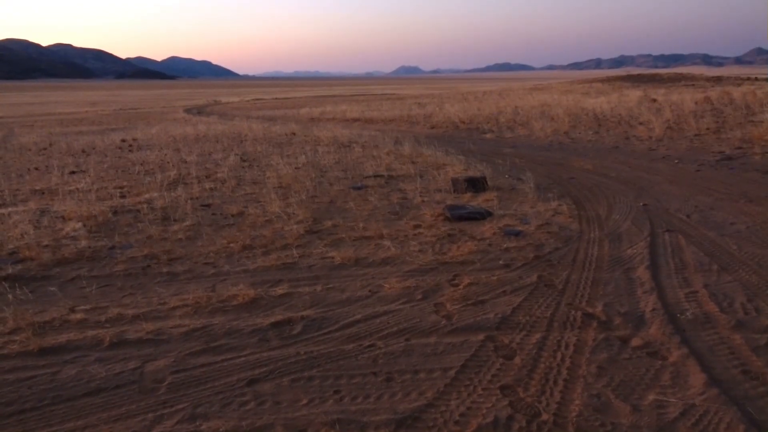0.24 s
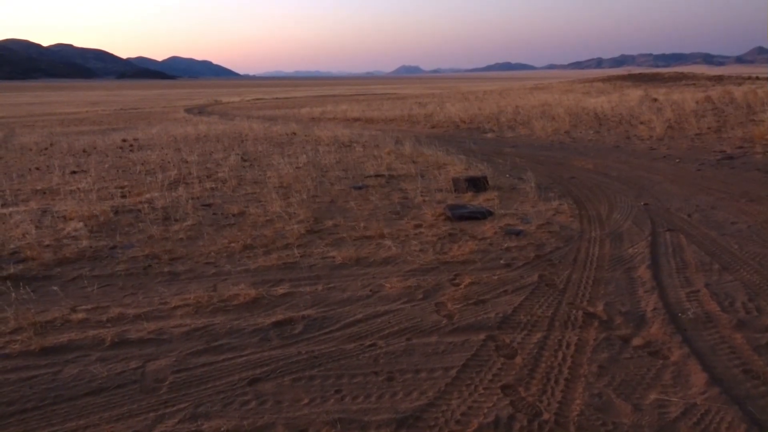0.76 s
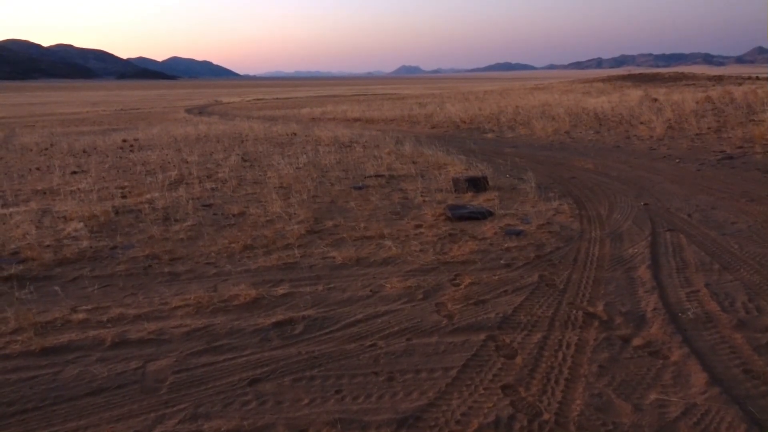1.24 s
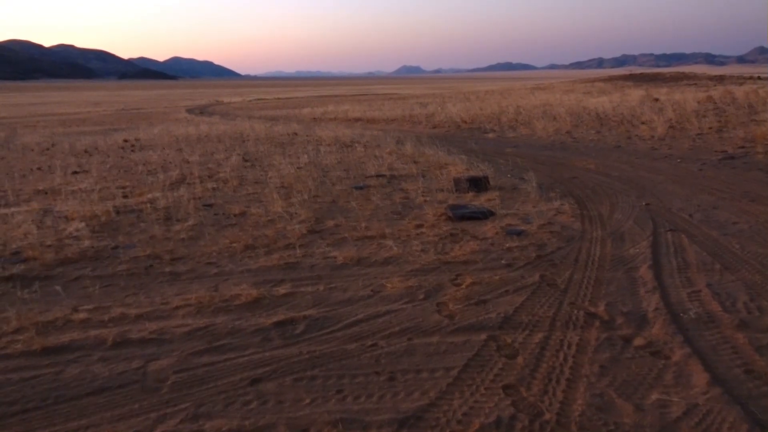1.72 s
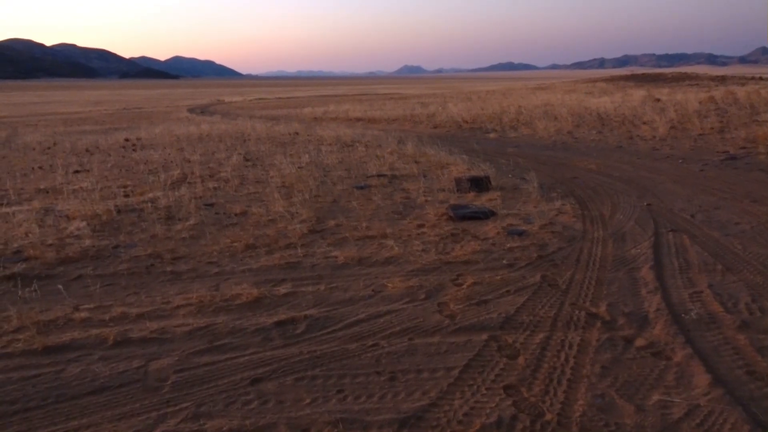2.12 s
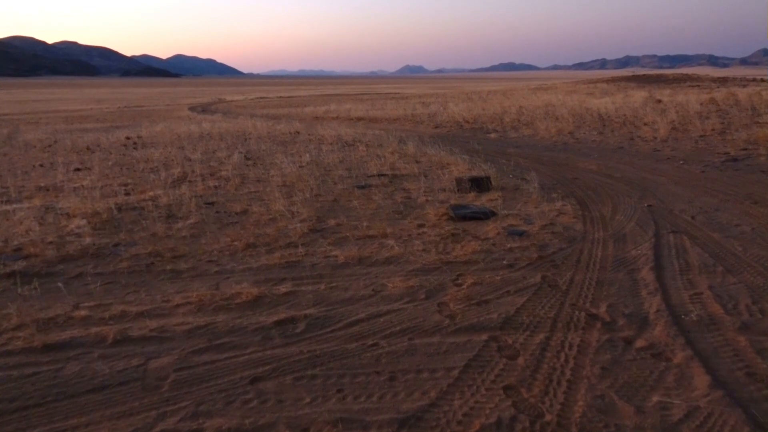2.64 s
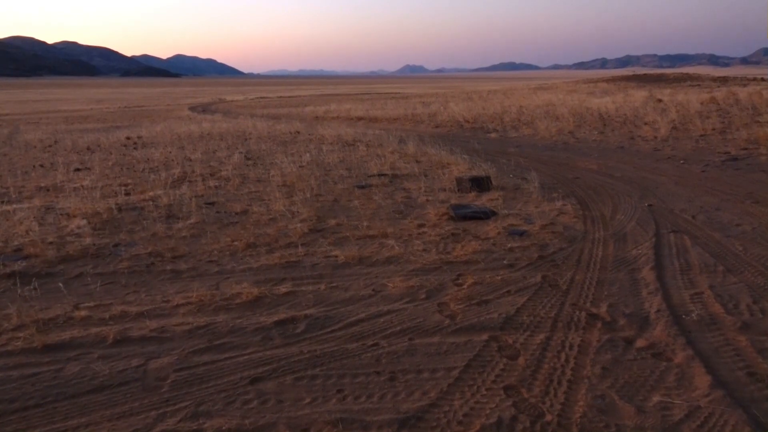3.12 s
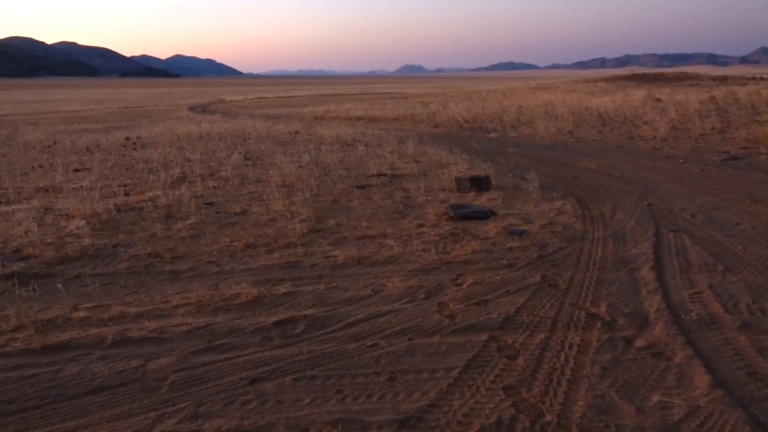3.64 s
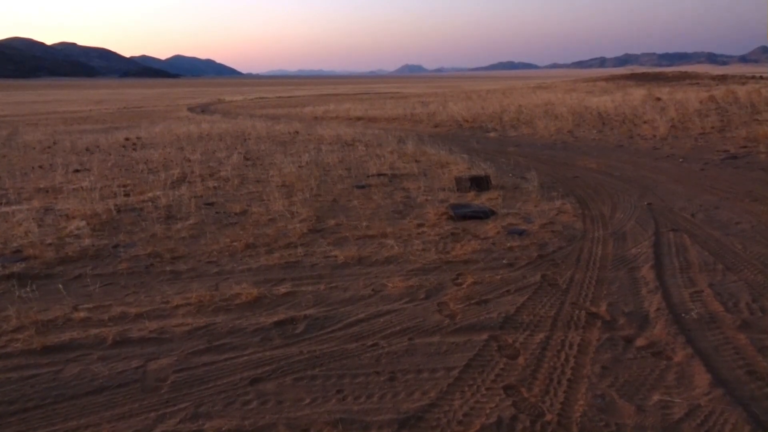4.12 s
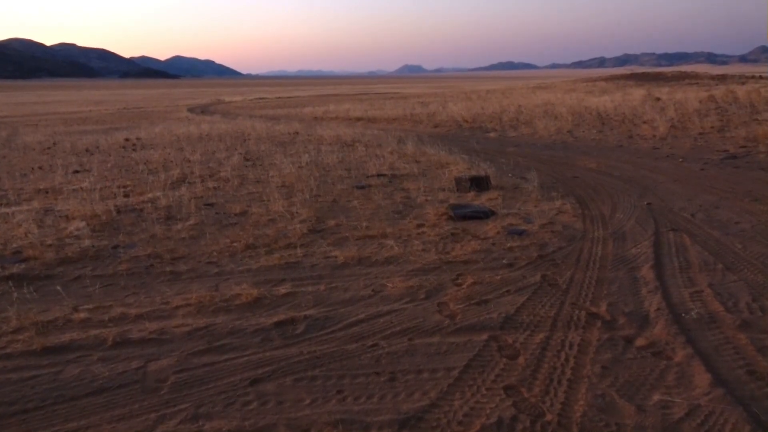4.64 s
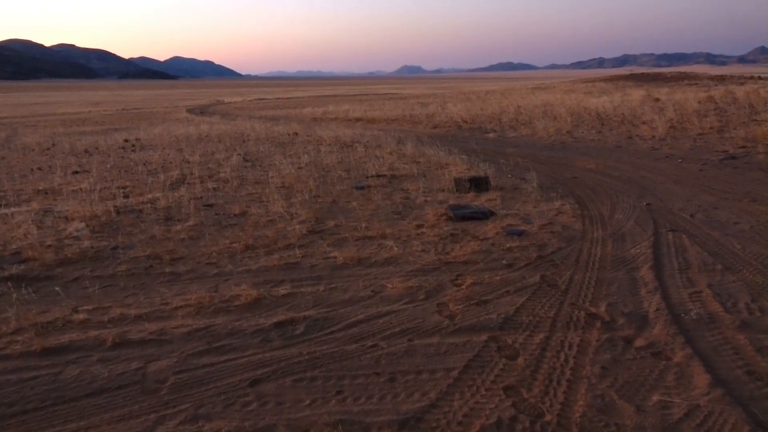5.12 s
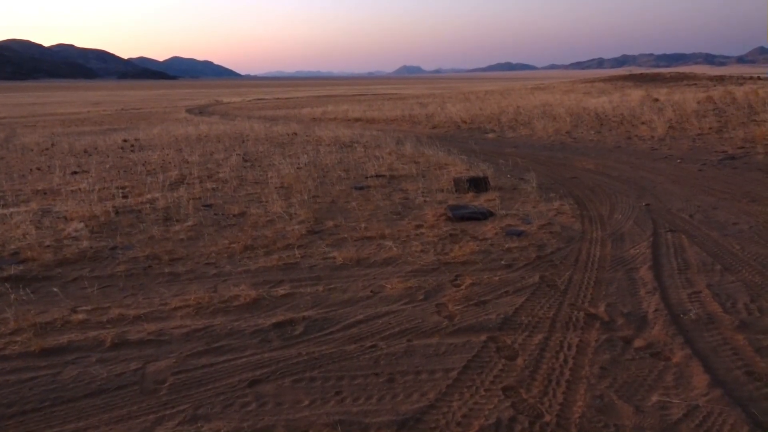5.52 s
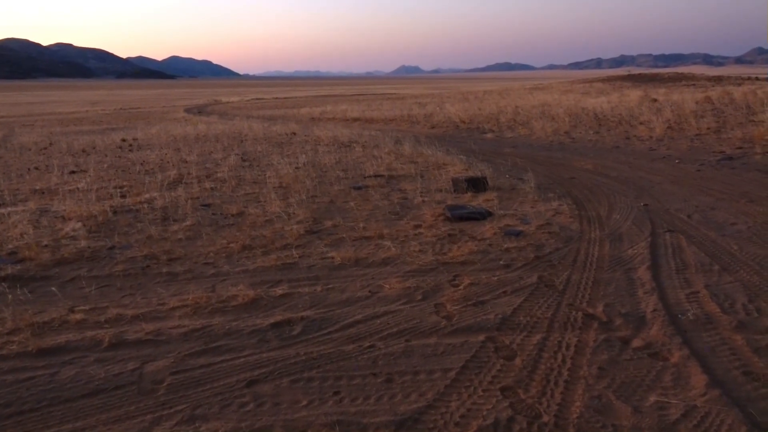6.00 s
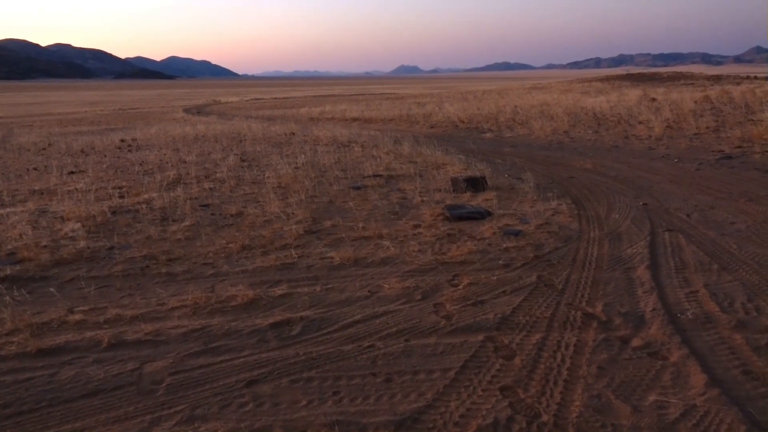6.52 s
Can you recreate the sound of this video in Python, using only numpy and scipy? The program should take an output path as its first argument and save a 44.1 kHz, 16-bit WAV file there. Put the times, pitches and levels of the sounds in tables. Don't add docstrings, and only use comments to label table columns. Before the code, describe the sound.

Stereo field sound of barking geckos in open desert grassland. Distant dry clicking runs come first, mostly left; a near caller follows with six sharp, evenly spaced rattling barks, very loud and bright. Left-side callers then overlap in medium-loud series before leaving only a blurred far chorus, steady microphone hiss and dull, irregular wind bumps, strongest in the middle.

```python
import sys
import numpy as np
from scipy import signal
from scipy.fft import rfft, irfft
from scipy.io import wavfile
from scipy.ndimage import uniform_filter1d, minimum_filter1d

SR = 44100
rng = np.random.default_rng(int(sys.argv[2]) if len(sys.argv) > 2 else 0)


def transcribe(u):
    v = np.clip(np.atleast_2d(u).T, -1, 1)
    q = np.round(v * 32767).astype(np.int16)
    wavfile.write(sys.argv[1], SR, q)


def elevation(decibels):
    levels = np.asarray(decibels, float)
    return 10 ** (levels / 20)


N = 298557


def shaped(x, points):
    hz, db = np.transpose(points)
    f = np.maximum(np.fft.rfftfreq(x.shape[-1], 1 / SR), 1)
    gain = elevation(np.interp(np.log(f), np.log(hz), db))
    return irfft(rfft(x) * gain, x.shape[-1])


def level(x, db):
    return x * elevation(db) / np.sqrt(np.mean(x ** 2))


def walk(rate):
    hold = int(SR / rate)
    steps = np.repeat(rng.standard_normal(N // hold + 1), hold)
    return 1.5 * uniform_filter1d(uniform_filter1d(steps, hold), hold)[:N]


def add(out, start, x):
    stop = min(start + x.shape[-1], N)
    out[..., start:stop] += x[..., :stop - start]


# f/Hz, level/dB [per Hz]
PLAIN_COLOUR = [(88, -15.5), (150, -33), (264, -13.5), (555, -5.5), (730, -7), (871, -2.5), (1040, -3),
                (1390, -5.5), (1530, -5), (2600, -7.5), (3100, -10), (3620, -6.5), (4240, -12),
                (13200, -17), (16000, -19)]
# f/Hz, likeness [-1 to 1]
LIKENESS = [(200, 0.86), (400, 0.38), (700, -0.046), (1300, 0.063), (3000, 0.34), (7000, 0.44),
            (15000, 0.53)]
# t/s, level/dB
CHORUS_SWELL = [(0, 1), (1, 1), (2, 0.5), (2.6, 3), (3.5, 2), (4.2, 1), (5, 3), (5.8, 1.5), (6.3, 1),
                (6.77, 0.5)]


def plain():
    mid, side = rng.standard_normal((2, N))
    like = [(hz, np.clip(c, -.95, .95)) for hz, c in LIKENESS]
    mid = shaped(mid, [(hz, 10 * np.log10(1 + c)) for hz, c in like])
    side = shaped(side, [(hz, 10 * np.log10(1 - c)) for hz, c in like])
    both = level(shaped(np.array([mid + side, mid - side]), PLAIN_COLOUR), -49)
    chorus = shaped(both, [(500, -56), (800, -5.0), (4500, 3.0), (5500, -50)])
    swell_db = np.interp(np.arange(N) / SR, *np.transpose(CHORUS_SWELL))
    flicker = elevation(1.4 * np.array([walk(22), walk(16)]) + swell_db)
    hiss = both - chorus
    return (hiss + flicker * chorus) * elevation(np.array([[0.1], [.4]]))


# centre t/s, peak level/dB, pitch f/Hz, length [cycles]
THUMPS = [(0.049, -31.5, 124, 1.2), (1.433, -34, 142, 1.4), (2.449, -13, 191, 0.76), (2.532, -29.5, 136, 1),
          (2.86, -31, 149, 2.1), (3.29, -28.5, 145, 1.4), (3.316, -29.5, 127, 2.1), (3.364, -23, 153, 0.61),
          (3.374, -25.5, 160, 0.98), (3.447, -12.5, 158, 0.35), (3.456, -25, 140, 3.6),
          (3.49, -21.5, 144, 0.55), (3.731, -21.5, 124, 0.48), (3.746, -18.5, 172, 0.94),
          (4.204, -32, 143, 0.77), (4.305, -26, 142, 0.59), (4.662, -22.5, 155, 0.92),
          (4.756, -22.5, 156, 1.1), (4.795, -21, 135, 0.41), (4.806, -18.5, 156, 1.04),
          (4.931, -30, 153, 0.53), (4.952, -17, 175, 0.61), (4.982, -17.5, 189, 1.1),
          (5.013, -14, 181, 0.44), (5.082, -23, 190, 0.84), (5.113, -22, 151, 0.97),
          (6.086, -20.5, 152, 1.4), (6.209, -23.5, 136, 0.63), (6.325, -31, 137, 1.3),
          (6.345, -23, 179, 1.44)]
# centre t/s, peak level/dB
NUDGES = [(0.087, -49), (0.329, -44.5), (1.459, -35.5), (1.754, -43), (2.013, -42), (2.06, -39),
          (2.105, -39.5), (2.18, -36.5), (2.427, -33.5), (2.49, -33), (2.679, -35), (2.832, -29.5),
          (2.892, -38), (2.96, -33.5), (3.246, -34.5), (3.638, -34.5), (3.785, -32), (3.839, -33),
          (4.105, -36.5), (4.158, -36.5), (4.444, -31.5), (4.699, -27.5), (4.737, -30), (4.853, -25),
          (5.238, -36.5), (5.371, -36), (6.068, -31.5), (6.13, -31.5), (6.281, -31), (6.734, -32.5)]
# t/s, level/dB
GUST = [(0, -48.5), (.17, -69), (.55, -79), (1.15, -81), (1.45, -64.5), (1.8, -80.5), (2.1, -62),
        (2.33, -68), (2.55, -57), (2.95, -62.5), (3.12, -72), (3.4, -50.5), (4.05, -70), (4.95, -47),
        (5.18, -60), (5.85, -83), (6.1, -75), (6.77, -62)]


def eddies():
    per_s = 9
    chance = rng.random((int(per_s * N / SR), 2)).T
    s = .05 + (np.arange(chance.shape[1]) + chance[0]) / per_s
    db = np.interp(s, *np.transpose(GUST)) + 17 + 4.3 * (chance[1] - .5)
    small = np.concatenate([NUDGES, np.transpose([s, db])])
    spread = rng.standard_normal((len(small), 2)).T
    hz = np.maximum(217.6 + 3 * small[:, 1], 100) * (1 + .08 * spread[0])
    cycles = 1.22 * np.exp(.25 * spread[1])
    return THUMPS + list(zip(*small.T, hz, cycles))


# f/Hz, level/dB [per Hz]
GUST_COLOUR = [(13, -48), (22, -18), (102, 0), (183, -2), (231, -6), (365, -20), (407, -26), (449, -27),
               (600, -36), (780, -66), (1320, -120)]


def wind():
    out = np.zeros((2, N))
    thumps = eddies()
    chance = rng.standard_normal((len(thumps), 3))
    for (s, db, hz, cycles), (turn, lag, pan) in zip(thumps, chance):
        side_delay_s = np.array([[0], [.0002 + .0006 * lag]])
        t = np.arange(-2000, 2000) / SR - side_delay_s
        u = t * hz / cycles
        bell = np.where(u < 0, np.exp(-(2.63 * u) ** 2), 1 / np.cosh(2.17 * u))
        phase = 2 * np.pi * hz * t * (1 - 6 * t) + .5 + 1.34 * turn
        swing = np.sin(phase) + 0.25 * np.cos(2 * phase + 0.1) * bell
        side_db = db + .6 * pan * np.array([[1], [-1]])
        add(out, int(s * SR) - 2000, elevation(side_db) * bell * swing)
    out = shaped(out, [(15, -42), (50, 4), (90, -1), (300, -1.15), (600, -14.5)])
    s, db = np.transpose(GUST)
    mid, side = rng.standard_normal((2, N))
    side = shaped(side, [(25, -20), (100, -9.0), (400, -6.5)])
    lumps = elevation(3.0 * walk(40))
    rumble = shaped(lumps * np.array([mid + side, mid - side]), GUST_COLOUR)
    return out + level(rumble, 0) * elevation(np.interp(np.arange(N) / SR, s, db) + 8.0)


def scatter(t60, start_s, size):
    t = np.arange(size) / SR
    h = rng.standard_normal((2, size)) * elevation(-60 * t / t60) * np.clip(t / start_s, 0, 1)
    return h / np.sqrt(np.sum(h ** 2, axis=1, keepdims=True))


def flutter(x, depth_s):
    n = np.arange(N)
    return np.array([np.interp(n + depth_s * SR * walk(300), n, side) for side in x])


def bark_length(base_s, index, opens):
    return base_s * (1 + opens * .38 * np.exp(-1.4 * index ** 2))


def bark(start, rate, snaps, first, last, ring_hz, ring_s, fade_db, snap_fade_db, sag, jitter, tiring):
    count = int(round(snaps))
    k = np.arange(count)
    chance = rng.standard_normal((32, 3))[:count].T
    slow_start = first * np.exp(-k * (13 / count) ** 3)
    slow_end = last * np.exp((k - count + 2) / 1.4)
    gap = (1 + slow_start + slow_end + jitter * chance[0]) / rate
    gap *= 1 + tiring * ((k / count) ** 3 - .12)
    gap[-1] = .006
    onset = (start * SR % 1 / SR + np.cumsum(gap) - gap)[:, None]
    clock = np.arange(int(SR * (onset[-1, 0] + gap[-1])))[None] / SR
    t = np.maximum(clock - onset, 0)
    late = (k / (count - 1))[:, None]
    closing = np.exp((k - count + 1) / 1.8)[:, None]
    choke = np.clip((gap[:, None] + .0002 - t) / .0005, 0, 1)
    hz = ring_hz * (1 - sag * late - .07 * closing + .011 * chance[1][:, None])
    lasting = np.exp(-t / (ring_s * np.exp(-0.81 * late - closing)))
    decay = .53 * lasting + (1 - .53) * np.exp(-t / .0006)
    scatter_db = .8 * chance[2][:, None]
    rise = 1 - np.exp(-(t / (0.000089 * (1 + 2.7 * late))) ** 2)
    ring = elevation(fade_db * late ** 1.82 - 1.2 * closing + scatter_db) * rise * decay * choke
    since = t - 1.25 / hz
    cycle = np.exp(-(since / 0.00015) ** 2) * np.cos(2 * np.pi * 2500 * since + 1.02)
    snap = elevation(snap_fade_db * late ** 2 + scatter_db) * cycle
    snap += elevation(-9 - 9.7 * late) * np.exp(-((since + .0001) / .000018) ** 2)
    mouth = np.sum(ring * np.sin(2 * np.pi * hz * t), axis=0)
    return -np.array([mouth, np.sum((t > 0) * snap, axis=0)])


def chorus_calls(geckos, base_s):
    calls = []
    for barks, hz, pan_db, opens, grows in geckos:
        for k, (s, db, rate) in enumerate(barks):
            snaps = rate * bark_length(base_s, k, opens)
            ring_hz = hz * (1 + .012 * rng.standard_normal())
            calls.append((s, db, rate, snaps, ring_hz, grows * k, pan_db))
    return calls


def distant(calls, loud_snap_db, snap_slope, jitter, wet_db):
    left, right = np.zeros((2, N))
    for s, db, rate, snaps, ring_hz, first, pan_db in calls:
        s -= .0003
        snap_db = loud_snap_db + snap_slope * (db + 15)
        last = .018 * snaps + .18
        ring, snap = bark(s, rate, snaps, first, last, 1.01 * ring_hz, ring_s=0.0042, fade_db=-5.5,
                          snap_fade_db=-8, sag=.08, jitter=jitter, tiring=.12)
        add(left, int(s * SR), elevation(db) * (ring + elevation(snap_db) * snap))
        add(right, int(s * SR), elevation(db - pan_db) * (ring + elevation(snap_db - 4) * snap))
    near_left, near_right = scatter(.012, .0002, size=SR // 40)
    left = left + elevation(-16) * signal.fftconvolve(left, near_left)[:N]
    right = .6 * np.roll(right, 3) + .8 * signal.fftconvolve(right, near_right)[:N]
    grass = signal.fftconvolve(left[None], scatter(0.61, 0.0027, size=SR // 3))[:, :N]
    grass = shaped(flutter(grass, 6e-5), [(1500, 4), (3000, 4.5), (4100, -3.5), (5500, 9)])
    heard = np.array([left, right]) + elevation(wet_db + np.array([[0], [-6]])) * grass
    return shaped(heard, [(700, -11), (1200, 4.0), (2000, 5.5), (2900, 2.5), (3600, 0.5), (4400, 1.0),
                          (5200, -6.5), (8000, -31)])


# t/s, peak level/dB, snap rate f/Hz
FAINT_A = [(0.2748, -30, 610), (0.4806, -28, 530), (0.6714, -30, 510), (0.853, -26, 440),
           (1.025, -26.5, 450), (1.1977, -26.5, 468), (1.3723, -27, 380), (1.5486, -30.5, 460)]
FAINT_B = [(0.1184, -36, 380), (0.3255, -31.5, 390), (0.5318, -35.5, 358), (0.7348, -33.5, 358)]
FAINT_C = [(0.2214, -31, 460), (0.4447, -35.5, 350), (0.6997, -28.5, 280), (0.9099, -28.5, 280),
           (1.1166, -27, 280)]
FAINT_D = [(0.8113, -34.5, 340), (1.0636, -30, 360), (1.2482, -29, 333), (1.4224, -31, 360),
           (1.5966, -33.5, 400), (1.758, -32, 320), (1.934, -33, 320), (2.1073, -35, 300)]
FAINT_E = [(1.001, -36, 340), (1.1768, -32, 330), (1.342, -27.5, 320), (1.5216, -30.5, 270),
           (1.6935, -30, 400)]
FAINT_F = [(3.6067, -34.5, 420), (3.8213, -32.5, 380), (4.0203, -33.5, 544), (4.222, -33, 340)]
FAINT_G = [(3.7523, -34, 410), (3.975, -36, 491), (4.1733, -33, 390)]
STRAY = [(2.1537, -37.5, 450), (2.185, -31.5, 520), (2.2818, -34, 370), (3.904, -38, 341),
         (4.6084, -31, 450), (4.72, -35, 340), (5.8917, -35, 450)]
# barks, mouth ring f/Hz, left minus right level/dB, share of a long opening bark [0 to 1],
# growth of the first gap [share per bark]
FAINT_GECKOS = [(FAINT_A, 4160, 28, 1, 0.0295), (FAINT_B, 3610, 10, 0, 0.034),
                (FAINT_C, 4080, 19, 0, 0.028), (FAINT_D, 3790, 14, 0, 0.019), (FAINT_E, 3890, 28, 0, 0.032),
                (FAINT_F, 4000, 17, 0, 0.032), (FAINT_G, 4050, 14, 0.86, 0.041),
                (STRAY, 4060, 12, 0, 0.015)]


def faint_geckos():
    return distant(chorus_calls(FAINT_GECKOS, .031), -3, .05, jitter=0.033, wet_db=-7)


# t/s, peak level/dB, snap
# rate f/Hz
LEFT_A = [(4.2908, -15.4, 523), (4.4949, -15, 463), (4.6735, -12.1, 433), (4.8363, -14.5, 425),
          (4.9968, -14.2, 427), (5.1566, -14.7, 409), (5.3149, -15.2, 412), (5.4751, -15.5, 399),
          (5.6419, -14.7, 399)]
LEFT_B = [(4.32, -17.5, 490), (4.5472, -20.1, 466), (4.7438, -19.8, 426), (4.9268, -19, 428),
          (5.1008, -17, 411), (5.2722, -18.9, 425), (5.4467, -18.9, 411), (5.6343, -19, 384)]
LEFT_C = [(4.3727, -27, 476), (4.6572, -20.6, 433), (4.9191, -17, 394), (5.1369, -19.5, 396),
          (5.3424, -21.3, 378), (5.5445, -20.9, 364), (5.7425, -23.2, 348), (5.9426, -25.5, 343),
          (6.1504, -25.9, 340)]
# barks, mouth ring f/Hz, left minus right level/dB, share of a long opening bark [0 to 1],
# growth of the first gap [share per bark]
LEFT_GECKOS = [(LEFT_A, 3880, 15, 1, .042), (LEFT_B, 3960, 15, .8, .022), (LEFT_C, 4070, 15, 0, .01)]


def left_geckos():
    return elevation(1.0) * distant(chorus_calls(LEFT_GECKOS, .0295), -10.5, .35, jitter=.016, wet_db=-15)


# t/s, peak level/dB, snap rate f/Hz, extra first gap [share], extra last gap [share]
NEAR = [
    (2.351, -2.5, 546, 0.07, 1.45),
    (2.563, 0.5, 472, -0.08, 0.59),
    (2.7501, 0, 460, 0.07, 0.48),
    (2.9282, 0, 447, 0.13, 0.48),
    (3.1038, 0, 442, 0.16, 0.67),
    (3.2775, 0.5, 439, 0.2, 0.65),
]
# delay t/s, left level/dB, right level/dB, smear t/s
ECHOES = [
    (0.047, -31, -21.5, 0.002),
    (0.014, -42, -19, 0.0072),
    (0.13, -54, -54, 0.0024),
    (0.14, -35, -43, 0.008),
]


def near_gecko():
    dry = np.zeros(N)
    for k, (s, db, rate, first, last) in enumerate(NEAR):
        s -= .0002
        snaps = rate * bark_length(.029, k, 1.08)
        ring, snap = bark(s, rate, snaps, first, last, 4240, ring_s=0.0068, fade_db=-6,
                          snap_fade_db=-5, sag=.04, jitter=.01, tiring=0.018)
        add(dry, int(s * SR), elevation(db - 0.95) * (ring + elevation(-4.5) * snap))
    dry = shaped(dry, [(500, -34), (800, -8.0), (1500, -4.0), (2300, 1.5), (3200, -0.5), (4600, 0.5),
                       (5300, -4.5), (6500, -4), (9500, -5.5), (16000, -5)])
    answer = elevation(-24.0) * scatter(0.82, 0.0035, size=SR // 2)
    for delay, left_db, right_db, smear in ECHOES:
        echo = scatter(smear * 4, .0001, size=SR // 20)
        add(answer, int(delay * SR), elevation(np.array([[left_db], [right_db]])) * echo)
    wet = signal.fftconvolve(dry[None], answer)[:, :N]
    wet = shaped(wet, [(800, 11.0), (2200, 6.0), (3200, 5), (4200, -2.0), (6000, 8.5)])
    return elevation(np.array([[1.0], [-1.6]])) * dry + flutter(wet, .00003)


def scene():
    return plain() + wind() + faint_geckos() + left_geckos() + near_gecko()


def roll_off(x):
    return signal.sosfilt(signal.butter(12, 16300, fs=SR, output="sos"), x)


def record(dry):
    dull = shaped(dry, [(15700, 0), (16100, -22)])
    room_left = np.minimum(1, 1.04 / (np.abs(dull) + 1e-9))
    gain = uniform_filter1d(minimum_filter1d(room_left, size=41), size=41)
    mix = np.clip(gain * dull, -1, 1)
    return roll_off(mix)


dry = scene()
out = record(dry)
transcribe(out)
```